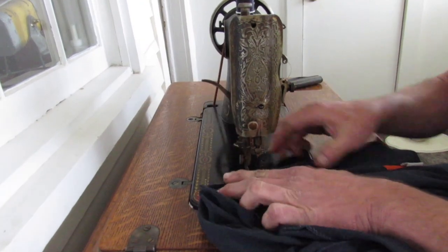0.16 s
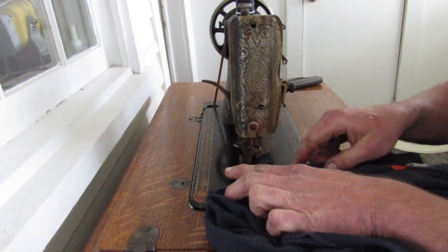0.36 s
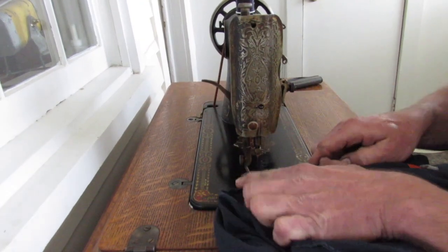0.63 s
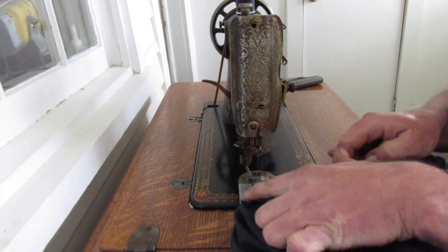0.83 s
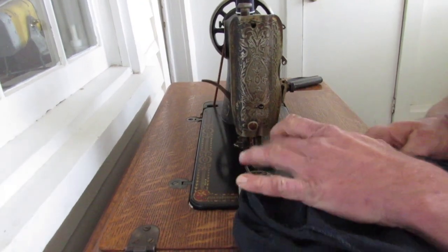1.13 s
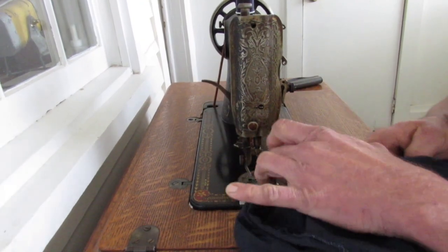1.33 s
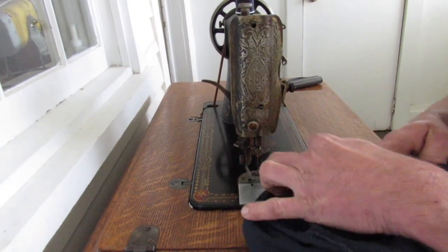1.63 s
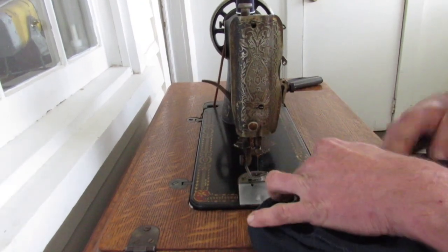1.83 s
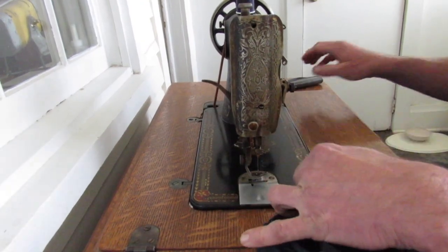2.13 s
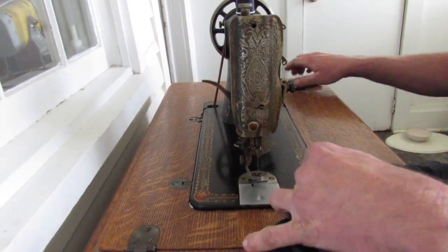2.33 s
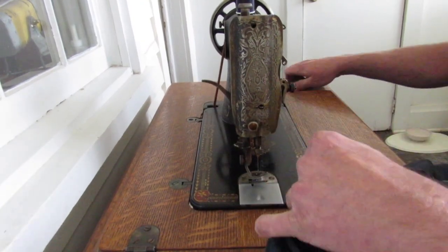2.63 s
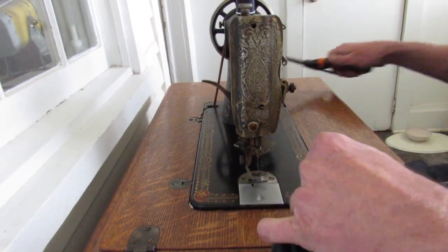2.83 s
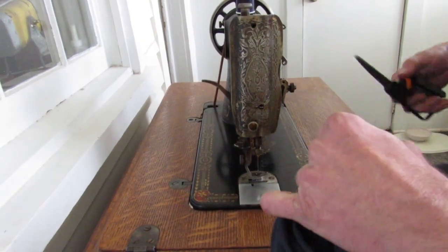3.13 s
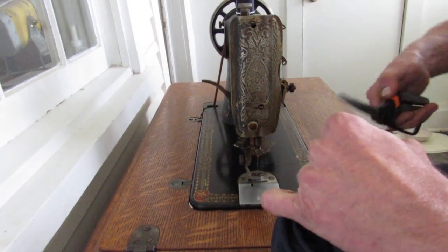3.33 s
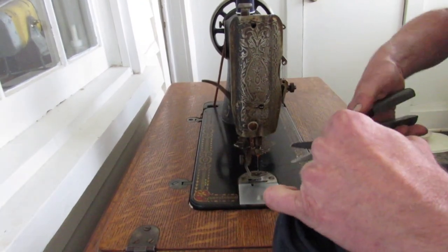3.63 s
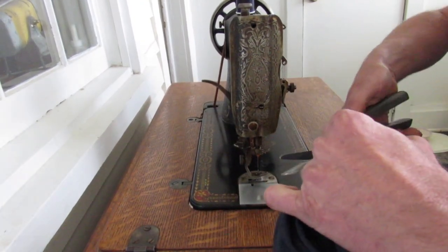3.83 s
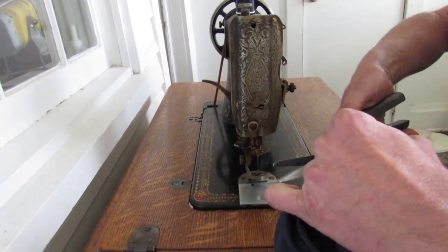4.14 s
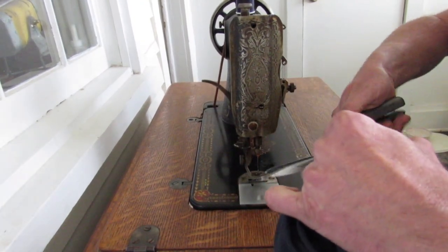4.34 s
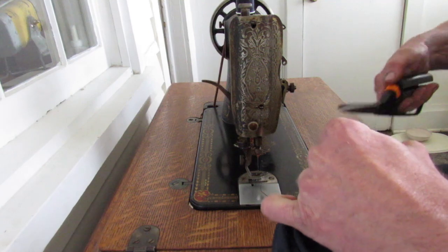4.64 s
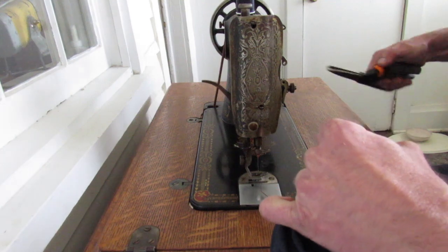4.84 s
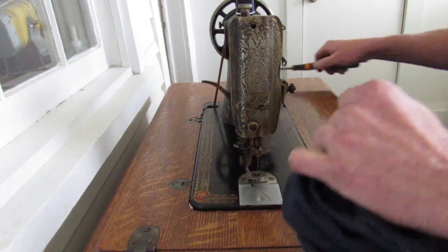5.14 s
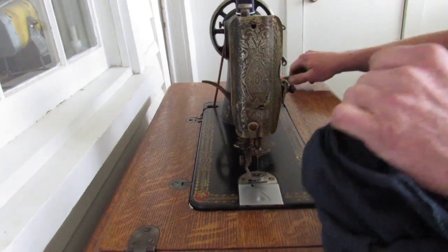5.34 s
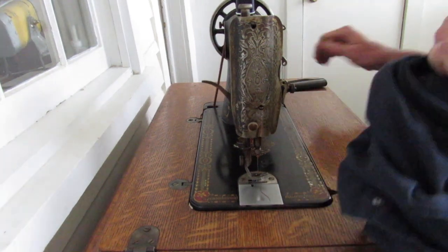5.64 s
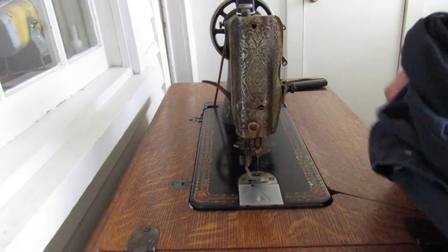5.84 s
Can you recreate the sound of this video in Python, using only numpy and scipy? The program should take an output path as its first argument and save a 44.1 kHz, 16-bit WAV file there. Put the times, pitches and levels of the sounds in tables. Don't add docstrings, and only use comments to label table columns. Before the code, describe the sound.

A small indoor room with steady, low mains hum and soft broadband noise, heard closely in stereo with a short reverberation. Cloth rustles quietly throughout. From 0 to 0.3 s come faint dry squeaks, then a soft hand thump on the table at 0.3. Fabric and thread are pulled in short brushing strokes around 0.8, 1.1-1.3 and 1.7-2.1 s, with crisp iron ticks at 1.1 and a sharper one at 1.8. Between 2.45 and 2.8 s shears are dragged off the wood with dull, clustered knocks and a scrape. They slide open thinly around 3.0, then snip at 3.2 and 3.5, again at 4.4, and close brightly around 4.9-5.1 with slight metallic squeaks. At 5.4 s they touch the table, bounce, and land at 5.48 with the loudest woody, ringing knock and a metallic glint. Soft cloth thumps follow at 5.6, with a last light rub and touch near 5.9.

```python
import sys
import numpy as np
from scipy import signal
from scipy.fft import rfft, irfft
from scipy.io import wavfile

SR = 44100
rng = np.random.default_rng(int(sys.argv[2]) if len(sys.argv) > 2 else 0)


def volts_from_db(level):
    exponent = np.asarray(level, float) / 20
    return 10 ** exponent


def log_audio(samples):
    frames = np.atleast_2d(samples).T
    limited = np.clip(frames, -1, 1)
    pcm = np.round(limited * 32767).astype(np.int16)
    wavfile.write(sys.argv[1], SR, pcm)


N = 263718

# mains_multiple, peak_db
HUM_TONES = [(2, -62), (3, -62.5), (4, -80), (6, -43), (7, -64), (8, -64), (9, -100), (10, -60.5)]
# pitch_hz, level_db (per Hz)
AIR_COLOUR = [(12, -69.5), (20, -25), (114, -10.5), (301, -15), (355, -13), (408, -21), (538, -19),
              (601, -19), (671, -29), (770, -15), (860, -26.5), (1170, -26.5), (2200, -40), (11300, -42),
              (14900, -42.5)]
# pitch_hz, level_db (per Hz)
PORT_COLOUR = [(12, -36), (20, -29), (114, -18), (193, -19.5), (301, -23.5), (355, -17), (408, -23.5),
               (553, -33.5), (601, -27), (690, -46), (792, -35.5), (935, -35), (3430, -58.5), (12200, -56),
               (14900, -59)]
# start_s, effort_db
RUSTLE_EFFORT = [(0.0, -50), (0.17, -55), (0.46, -55.5), (1.279, -53), (1.9, -55), (2.15, -59), (2.65, -53),
                 (2.85, -56.5), (3.15, -58), (3.28, -64), (3.5, -61.5), (4.3, -60), (4.66, -64.5),
                 (4.88, -59), (5.09, -55.5), (5.48, -57.5), (5.66, -63), (5.98, -54)]
# pitch_hz, width_hz, level_db
RUB_BODY_BANDS = [(930, 353, -3), (1367, 460, 2.5), (2010, 313, 2), (2640, 1200, -4)]
# pitch_hz, level_db (per Hz)
RUB_HISS_COLOUR = [(1760, -32), (3000, -7), (3840, -4.5), (4110, -4.5), (7460, -7), (8080, -7.5),
                   (8760, -6), (14900, -13.5)]
# start_s, peak_db, pitch_hz, t60_s
SOFT_THUDS = [(0.2991, -27, 340, .07), (0.303, -36.5, 130, 0.11), (0.339, -37, 270, .06),
              (0.363, -40, 177, .08), (5.566, -38, 160, .15), (5.601, -32, 260, 0.12),
              (5.629, -31.5, 235, .12), (5.659, -40, 175, .12), (5.929, -43, 180, 0.13),
              (2.465, -26.5, 290, .06), (2.536, -39, 150, .2), (5.681, -39, 240, .15),
              (5.4, -42.5, 140, .2), (5.64, -35.5, 520, .08), (2.604, -29.5, 296, .08),
              (5.591, -42, 84, .25), (5.619, -34, 360, 0.066), (5.92, -53, 70, .2), (5.49, -25, 310, .09)]
# start_s, rms_db, length_s
SPRING_SQUEAKS = [
    (0.0, -61, 0.04),
    (0.054, -58, 0.057),
    (0.168, -62.5, 0.055),
    (0.309, -54, 0.022),
    (0.82, -66, 0.065),
]
THREAD_SQUEAKS = [
    (1.075, -67, .02),
    (1.176, -57.5, 0.042),
    (1.254, -60.5, 0.031),
    (1.743, -60, 0.06),
    (3.229, -65, .04),
    (3.545, -66, 0.028),
    (4.4, -65, .035),
]
GUIDE_SQUEAKS = [
    (0.766, -67.5, 0.14),
    (1.251, -56, 0.023),
    (2.093, -67, 0.067),
    (2.668, -69, 0.036),
    (3.523, -59.5, 0.027),
]
PIVOT_SQUEAKS = [
    (2.51, -72, 0.167),
    (2.96, -74, 0.18),
    (3.104, -68, 0.091),
]
# start_s, pitch_hz, rms_db, length_s
BLADE_SQUEAKS = [(3.089, 5580, -71, .2), (3.231, 2130, -63, 0.027), (3.529, 2090, -55, 0.016),
                 (4.444, 2400, -58, 0.031), (4.923, 3900, -65, 0.021), (4.927, 12600, -62, 0.023),
                 (5.05, 1570, -61, 0.067), (5.394, 2600, -50, 0.04), (5.482, 2880, -46, 0.02),
                 (5.48, 9760, -39.5, 0.003), (5.484, 8500, -44, 0.0036), (5.485, 6300, -41, .004),
                 (5.955, 2740, -62, .025)]
# start_s, peak_db, body_db
IRON_TICKS = [(0.2987, -29, -14), (0.605, -32, -6.5), (1.102, -22, -8), (1.1363, -25, -22.5),
              (1.7443, -24.5, -15), (1.818, -18.5, -20), (2.5122, -33, 13), (2.7657, -45, 17),
              (3.151, -45.5, 5), (3.5324, -53.5, -3), (3.8074, -56, 2), (5.907, -53, -1)]
# pitch_hz, level_db, t60_s
IRON_MODES = [(2300, -5, .008), (3200, -6, .006), (4200, -6, .006), (5400, 0, .012), (6600, -6, .006),
              (7600, -7, .01), (8900, -9, .008)]
# start_s, body_db, brightness_db (per octave), t60_s
CLOTH_PULLS = [(0.004, -56.5, 8, 0.24), (0.047, -55, 3, 0.18), (0.304, -42, -9, 0.32),
               (0.378, -50, -1, 0.12), (0.602, -51, -3, 0.43), (0.783, -41, 0, 0.16),
               (0.809, -40.5, -2, 0.3), (0.836, -39, -1.5, 0.14), (0.869, -53, 4, 0.091),
               (1.062, -50, -2, 0.11), (1.105, -40.5, -1, 0.11), (1.134, -43, -1, 0.26),
               (1.175, -37.5, -1, 0.1), (1.194, -46, 1, 0.27), (1.251, -36, -3, 0.086),
               (1.279, -48, -5, 0.24), (1.654, -50, -5, 0.21), (1.714, -47.5, 1, 0.1),
               (1.743, -40, -1.5, 0.26), (1.774, -45, -8, 0.14), (1.818, -34.5, 0.1, 0.11),
               (1.856, -41.5, -8, 0.1), (2.008, -50.5, -1, 0.27), (2.103, -42.5, -3, 0.22),
               (5.906, -46.5, -8, 0.3), (5.948, -51, 4, 0.17)]
# start_s, body_db, brightness_db (per octave), t60_s
SHEAR_SLIDES = [
    (2.513, -41, 3, 0.08),
    (2.766, -35.5, -6.5, 0.26),
    (2.95, -54.5, 15, 0.084),
    (3.021, -57.5, 17.5, 0.21),
    (3.099, -51.5, 8, 0.29),
    (3.178, -47, -5, 0.25),
]
# start_s, body_db, brightness_db (per octave), t60_s
BLADE_SNIPS = [
    (3.151, -48.5, 2, 0.27),
    (3.236, -41, 0.5, 0.13),
    (3.526, -41.5, 0.5, 0.15),
    (3.551, -51, -6, 0.2),
    (4.398, -45.5, 3, 0.099),
    (4.429, -46.5, -1, 0.176),
    (4.93, -47.5, 8, 0.072),
    (5.034, -49, 4.5, 0.43),
    (5.068, -48, 4, 0.17),
]
# pitch_hz, level_db, t60_s
TABLE_LOW_MODES = [(245, -12, 0.097), (306, -2.5, 0.074), (413.3, -0.5, 0.26), (455, -5.5, 0.1),
                   (480, -10.5, 0.13), (540, -9, .18), (586, -7.5, 0.11)]
# pitch_hz, level_db, t60_s
TABLE_HIGH_MODES = [(830, -11, .12), (976, -10, .12), (1050, -3, .2), (1121, 0, .25), (1237, -5, .18),
                    (1348, -2, .2), (1427, -4, .18), (1555, -8, .15), (1640, -7, .15), (1705, -5, .18),
                    (1880, -10, .15), (2050, -13, .1), (2190, -11, .15), (2390, -11, .12), (2570, -13, .14),
                    (2810, -13, .12), (3050, -17, .1), (3400, -20, .1), (3790, -24, .08)]
# start_s, peak_db, boom_db, crack_db, hardness_db (per octave)
HAND_BLOWS = [
    (0.3, -39, 7.5, -13.5, 2),
    (3.806, -48, -3.5, -20, 2),
    (5.907, -43.5, 3, -18, -2),
]
DRAG_BLOWS = [(2.457, -31.5, 10.5, -21.5, -4), (2.469, -36.5, 13.5, -33, -9),
              (2.513, -42.5, 17.5, -14, -6.5), (2.598, -37.5, 13, -33, -8), (2.619, -48, 14, -24, -8),
              (2.675, -44.5, -3, -18, 1), (2.693, -36.5, 14, -26, -14), (2.735, -48.5, 11, -12, 1),
              (2.765, -37, 10, -34, 2), (2.787, -55.5, 24.5, -24, 12), (2.655, -48.5, 13.5, -30, -9)]
DROP_BLOWS = [
    (5.395, -26.5, 10.5, -22.5, -0.8),
    (5.422, -33.5, 12.5, -31, 1.5),
    (5.448, -32, 6.5, -21, 0.5),
    (5.481, -14.5, 2.5, -25.5, -2.5),
    (5.498, -25, 4.5, -37, 2),
    (5.508, -24.5, 3.5, -38, -9),
    (5.525, -41, 14, -31, -6),
    (5.555, -32, 5.5, -35, -10),
]


def rms_one(x):
    return x / np.sqrt(np.mean(x ** 2) + 1e-20)


def coloured(x, spectrum):
    hz, db = np.transpose(spectrum)
    grid = np.fft.rfftfreq(len(x), 1 / SR) + 1
    gain = volts_from_db(np.interp(np.log(grid), np.log(hz), db))
    return rms_one(irfft(rfft(x) * gain, len(x)))


def band(x, low_hz, high_hz):
    return signal.sosfilt(signal.butter(2, [low_hz, high_hz], "band", fs=SR, output="sos"), x)


def ring(force, hz, t60):
    r, w = volts_from_db(-60 / (t60 * SR)), 2 * np.pi * hz / SR
    return signal.lfilter([0, np.sin(w)], [1, -2 * r * np.cos(w), r * r], force)


def resonance(x, hz, width_hz):
    r = np.exp(-np.pi * width_hz / SR)
    top = np.array([1, 0, -1]) * (1 - r * r) / 2
    return signal.lfilter(top, [1, -2 * r * np.cos(2 * np.pi * hz / SR), r * r], x)


def struck(force, modes, spread_db, tilt_db=0, damping=1):
    out = np.zeros(len(force))
    chance = rng.standard_normal((len(modes), 2))
    for (hz, db, t60), (luck, sign) in zip(modes, chance):
        strength = volts_from_db(db + spread_db * luck + tilt_db * np.log2(hz))
        out += np.sign(sign) * strength * ring(force, hz, damping * t60)
    return out / np.abs(out).max()


def add(track, s, sound):
    i = round(s * SR)
    track[i:i + len(sound)] += sound[:N - i]


def grains(size, per_s, uneven_db):
    catches = rng.random(size) < per_s / SR
    strength = volts_from_db(uneven_db * np.minimum(rng.exponential(1, size), 4))
    return rms_one(catches * strength * rng.standard_normal(size))


def hum():
    mains_hz = 59.983
    t = np.arange(N) / SR
    waver = np.interp(t, np.linspace(0, N / SR, 40), rng.standard_normal(40))
    tones = np.zeros(N)
    for k, db in HUM_TONES:
        tones += volts_from_db(db) * np.sin(2 * np.pi * (k * mains_hz * t + rng.random()))
    return volts_from_db(0.033 * waver) * tones


def air():
    return volts_from_db(-54.5) * coloured(rng.standard_normal(N), AIR_COLOUR)


def port_noise():
    return volts_from_db(-46.5) * coloured(rng.standard_normal(N), PORT_COLOUR)


def room(x):
    t60_s, alike_db, unlike_db = 0.25, -7, -5.5
    t = np.arange(SR // 2) / SR
    onset = np.clip((t - 0.003) / 0.0017, 0, 1)
    tails = rng.standard_normal((2, len(t))) * volts_from_db(-60 * t / t60_s) * onset
    tails /= np.sqrt(np.sum(tails ** 2, axis=1, keepdims=True))
    alike, unlike = signal.fftconvolve(x[None], tails, axes=1)[:, :N]
    return volts_from_db(alike_db) * alike, volts_from_db(unlike_db) * band(unlike, 6200, 14000)


def cloth(size, tilt_db=0):
    fibres = grains(size, per_s=8000, uneven_db=0.5)
    body = np.zeros(size)
    for k, (hz, width_hz, db) in enumerate(RUB_BODY_BANDS):
        strength = volts_from_db(db + tilt_db * np.log2(hz))
        body += (-1) ** k * strength * resonance(fibres, hz, width_hz)
    return rms_one(body), coloured(fibres, RUB_HISS_COLOUR)


def rustle():
    effort_db = np.interp(np.arange(N) / SR, *np.transpose(RUSTLE_EFFORT))
    hiss_db = -70.5 + 1.16 * (effort_db + 57.5)
    body, hiss = cloth(N)
    return volts_from_db(effort_db - 8) * body + volts_from_db(hiss_db) * hiss


def thuds():
    out, t = np.zeros(N), np.arange(SR // 4) / SR
    for s, db, hz, t60 in SOFT_THUDS:
        puff = rng.standard_normal(len(t)) * 0.021 * volts_from_db(-60 * t / t60)
        puff[:90] += np.hanning(90) / 6
        body = resonance(resonance(puff, hz, 0.77 * hz), hz, 0.77 * hz)
        body = band(body, 0.24 * hz, 4 * hz)
        add(out, s, volts_from_db(db) * body / np.abs(body).max())
    return out


def squeaks():
    out, t = np.zeros(N), np.arange(SR // 3) / SR
    parts = [(1373, SPRING_SQUEAKS), (7400, THREAD_SQUEAKS),
             (8700, GUIDE_SQUEAKS), (4550, PIVOT_SQUEAKS)]
    events = [(s, hz, db, length) for hz, rows in parts for s, db, length in rows]
    for s, hz, db, length in events + list(BLADE_SQUEAKS):
        slips = grains(len(t), per_s=4000, uneven_db=-0.5)
        width_hz = 0.089 * hz
        tone = rms_one(resonance(resonance(slips, hz, width_hz), hz, width_hz))
        shape = np.clip(t / 0.0014, 0, 1) / (1 + (t / length) ** 6)
        add(out, s, volts_from_db(db) * tone * shape)
    return out


def ticks():
    out, force = np.zeros(N), np.full(SR // 8, 1e-18)
    force[:3] = 0.5, 1, 0.5
    body = resonance(force, 2100, 1250)
    body = body / body.max()
    for s, db, body_db in IRON_TICKS:
        iron = struck(force, IRON_MODES, spread_db=1.5)
        add(out, s + 0.00056, volts_from_db(db - 9) * (iron + volts_from_db(body_db - 1) * body))
    return out


def rubs(table, hiss_db):
    out, t = np.zeros(N), np.arange(SR // 3) / SR
    for s, db, tilt_db, t60 in table:
        body, hiss = cloth(len(t), tilt_db)
        rise_s = 0.0093 * volts_from_db(-0.37 * max(db + 53, 0))
        shape = (1 - np.exp(-t / rise_s)) * volts_from_db(-60 * t / t60)
        sound = body + volts_from_db(hiss_db + tilt_db) * hiss
        add(out, s, volts_from_db(db - 9.5) * shape / shape.max() * sound)
    return out


def knocks(table, rattle_s):
    bloom_s = 0.0017
    out, t = np.zeros(N), np.arange(SR // 3) / SR
    for s, db, boom_db, crack_db, tilt_db in table:
        noise = rng.standard_normal((3, len(t)))
        force = 0.078 * noise[0] * np.exp(-t / rattle_s) + 1e-18
        force[0] = 1
        blur_top_hz = 950 + 1500 * volts_from_db(1.8 * tilt_db)
        blur = rms_one(band(noise[1], 890, blur_top_hz)) * np.exp(-t / 0.025)
        crack = band(noise[2], 3100, 11300) * np.exp(-t / 0.033)
        clack = struck(force, TABLE_HIGH_MODES, spread_db=3.5, tilt_db=tilt_db, damping=0.42)
        clack = band(clack + volts_from_db(-15) * blur, 490, 9000)
        push = signal.lfilter(np.hanning(40), 1, force * np.exp(-t / 0.0006)) + 1e-18
        boom = struck(push, TABLE_LOW_MODES, spread_db=1.0, damping=0.57)
        boom = boom * (1 - np.exp(-t / bloom_s))
        add(out, s, volts_from_db(db) * (clack + volts_from_db(boom_db) * boom + volts_from_db(crack_db) * crack))
    return out


def scene():
    blows = knocks(HAND_BLOWS, rattle_s=0.0038)
    blows += knocks(DRAG_BLOWS, rattle_s=0.014)
    blows += knocks(DROP_BLOWS, rattle_s=0.015)
    friction = rubs(CLOTH_PULLS, hiss_db=-4)
    friction += rubs(SHEAR_SLIDES, hiss_db=-14.5)
    friction += rubs(BLADE_SNIPS, hiss_db=-6.5)
    friction += squeaks() + rustle()
    work = band(blows + ticks() + friction, 320, 12500) + thuds()
    alike, unlike = room(work)
    mid = work + alike + hum() + air()
    side = unlike + port_noise()
    return np.array([mid + side, mid - side])


def band_limit(x):
    return signal.sosfilt(signal.butter(12, 15010, fs=SR, output="sos"), x)


def record(dry):
    mid, side = (dry[0] + dry[1]) / 2, (dry[0] - dry[1]) / 2
    bass = signal.lfilter(*signal.butter(1, 760, fs=SR), mid)
    widening = volts_from_db(1.5) * signal.lfilter(*signal.butter(1, 2600, fs=SR), bass)
    side = side + widening + 0.2 * (mid - bass)
    both = np.array([mid + side, mid - side])
    both = both - 0.71 * resonance(both, 711, 220)
    both = signal.sosfilt(signal.cheby2(10, 60, 15900, fs=SR, output="sos"), both)
    return band_limit(both)


dry = scene()
out = record(dry)
log_audio(out)
```